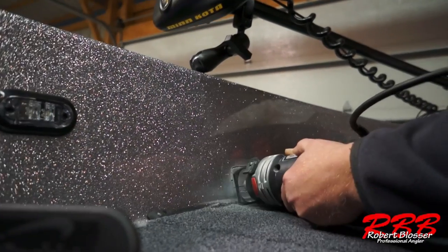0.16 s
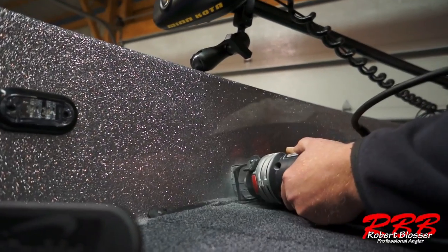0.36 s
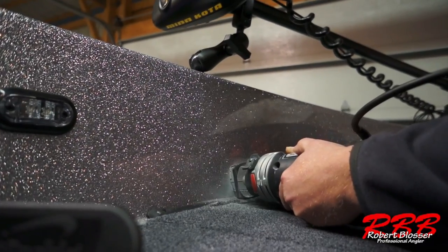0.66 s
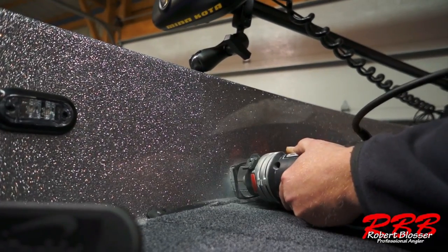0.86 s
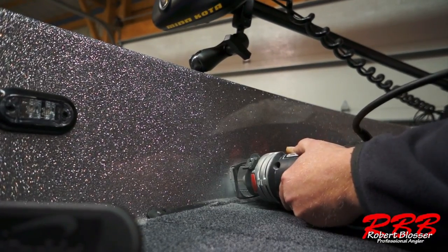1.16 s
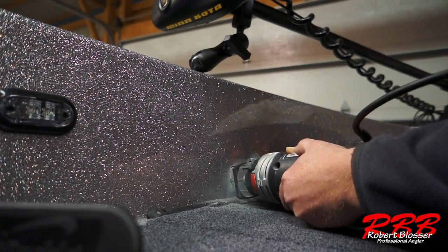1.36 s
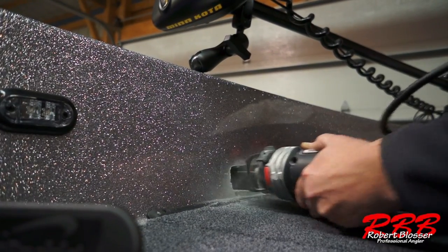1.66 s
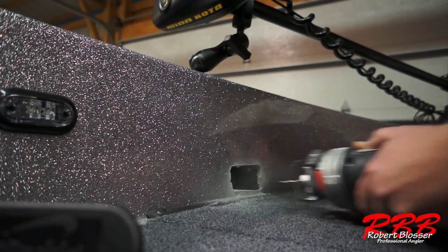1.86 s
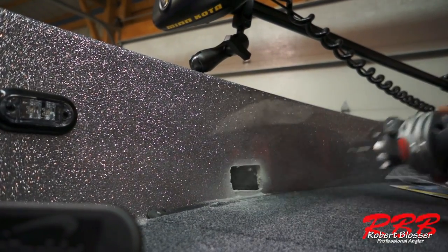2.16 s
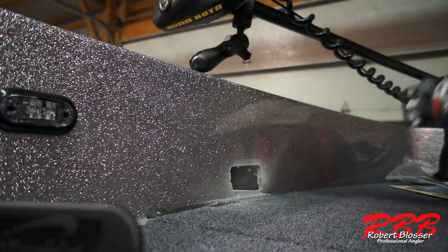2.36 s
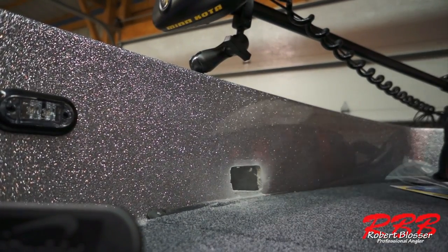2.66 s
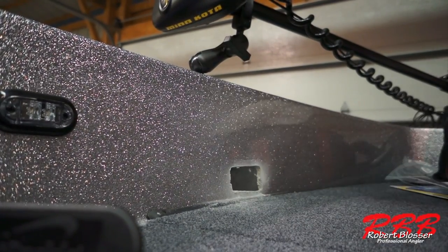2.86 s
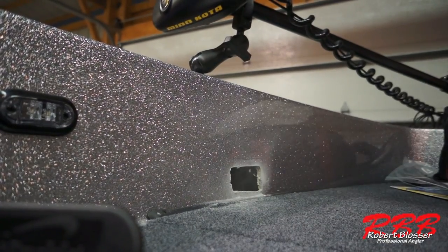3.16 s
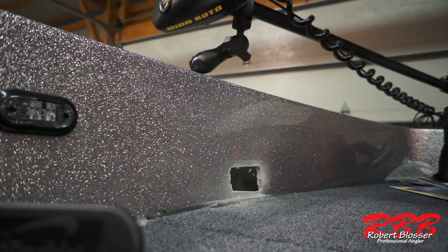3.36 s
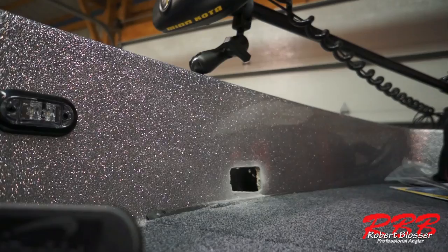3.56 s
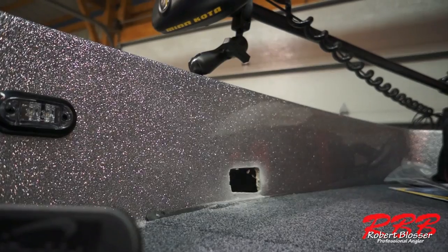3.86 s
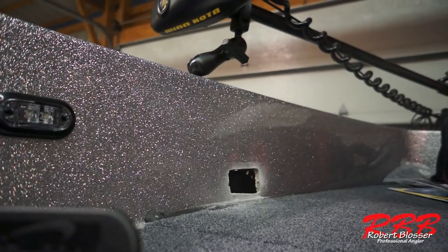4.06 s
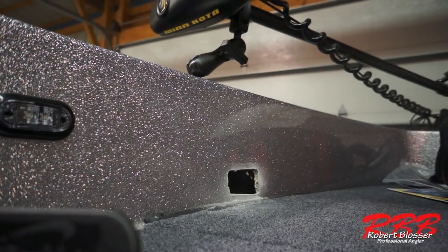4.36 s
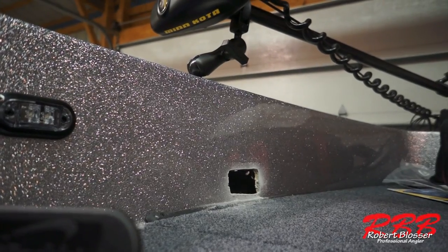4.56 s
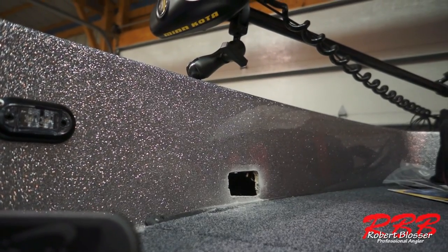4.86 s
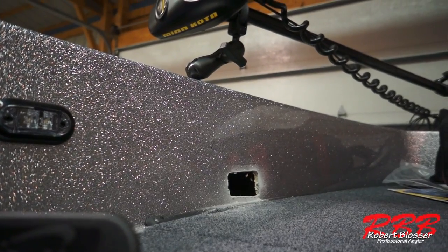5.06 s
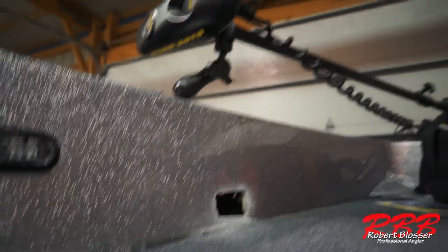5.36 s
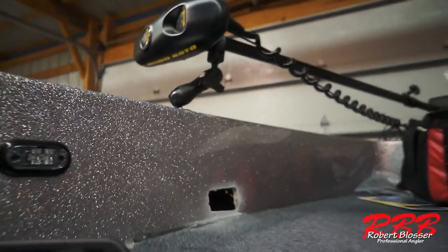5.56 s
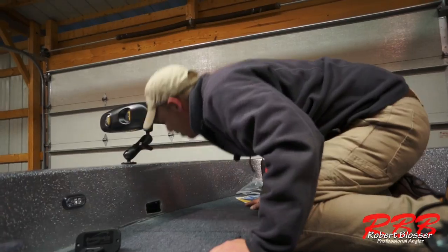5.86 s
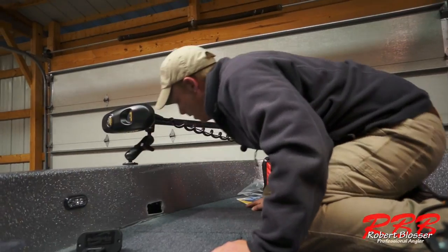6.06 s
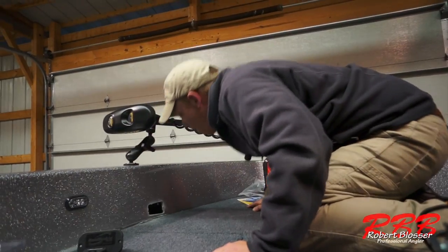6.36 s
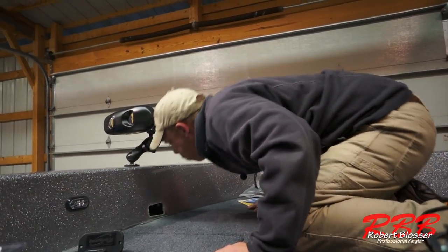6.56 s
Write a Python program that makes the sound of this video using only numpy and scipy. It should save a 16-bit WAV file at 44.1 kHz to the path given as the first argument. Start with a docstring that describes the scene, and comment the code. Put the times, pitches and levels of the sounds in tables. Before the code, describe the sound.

Close up in a garage, a small high-speed power saw is already cutting fibreglass: a steady, harsh buzzing whine with bright rasp and hiss. It comes out of the panel, rises slightly in pitch and runs free with airy fan noise. Switched off, it glides down over about two seconds with rattling bearing tones, then stops abruptly, leaving a quiet room and a soft thump.

```python
"""First a hand-held spiral saw cuts a fibreglass panel in a garage: its bit shakes the panel once a turn.
Very early the level dips briefly. The saw is drawn back, its echo off the panel changes, and it runs free.
Switched off, it coasts down: fan hiss, housing rumble and bearing tones change along the way.
At the end a short hiss and ring die away, a few low thumps sound, and the garage is nearly silent.
Tones are sines that follow the shaft speed; airflow, rattle and room are shaped noise."""
import sys
import numpy as np
from scipy import signal
from scipy.io import wavfile
from scipy.ndimage import uniform_filter1d, map_coordinates

SR = 44100
rng = np.random.default_rng(int(sys.argv[2]) if len(sys.argv) > 2 else 0)


def wav_out(sig):
    """Save sig, one row per channel (or a flat mono array), as 16-bit PCM at SR to the path in sys.argv[1]."""
    wavfile.write(sys.argv[1], SR, np.round(np.clip(np.atleast_2d(sig).T, -1, 1) * 32767).astype(np.int16))


N = 296352  # length in samples

# An "order" is a pitch counted in shaft turns: order 3 sounds three times a turn.
# Noise colours give only the shape of a noise; its level is set separately.

# quiet room noise: hz, relative_db_per_hz
GARAGE_COLOUR = [(15, -35), (25, -5), (75, 2), (180, -5), (437, -10), (594, -6), (657, -8), (1500, -12),
                 (2500, -16), (5210, -24), (6200, -21), (6600, -13), (7000, -23), (9130, -21), (11200, -32),
                 (14600, -62), (22000, -120)]
GARAGE_LEVEL_DB = -73
# faint tones in the garage: pitch_hz, level_db
GARAGE_TONES = [(360, -87), (1922, -93), (6487, -94), (6605, -87), (8888, -98)]
# hiss that dies away after the saw: hz, relative_db_per_hz
AFTER_COLOUR = [(40, -14), (150, -3), (300, -9), (500, -3), (1000, -6), (2200, -6), (3000, -12),
                (6000, -17), (9000, -22), (11200, -30)]
AFTER_START_DB, AFTER_DB_PER_S = -47, -135
RING_HZ, RING_START_DB, RING_DB_PER_S = 3400, -60, -100  # a ring in that tail

# dull low thumps: start_s, level_db, pitch_hz, time_to_fall_60_db_s
THUMPS = [(.768, -36, 80, .04), (.77, -36, 300, .025), (1.46, -42, 180, .05), (1.515, -44, 110, .06),
          (1.66, -48, 115, .18), (5.742, -53, 140, .04), (6.676, -38, 120, .03), (6.694, -40, 170, .03),
          (6.704, -42, 430, .025)]

# how alike left and right noise are: hz, likeness (1 is the same)
LIKENESS = [(60, 0.31), (140, 0.46), (250, 0.91), (600, 0.78), (1400, 0.85), (3000, 0.56), (6000, 0.43),
            (8500, 0.31), (11000, 0.57)]
# peaks and dips in the saw's noise while held against the panel: hz, change_db
IN_CUT_COLOUR = [(450, 3.5), (600, 3.5), (750, -1), (900, 0.5), (1150, 3), (1350, -4), (1600, 0.5),
                 (1800, -2.5), (2000, 1.5), (2450, 0.5), (2750, -3.5), (3150, -2.5), (3600, 4), (3900, -1),
                 (4700, 1.5), (5100, 0), (5350, 2), (5900, -0.5), (6400, 2.5)]
STREAK_DB = 2.24  # narrow, lasting random peaks within each noise

# noise levels: time_s, fan_hiss_db, rasp_db, buzz_db, rumble_db
AIR_LEVELS = [(0, -24.5, -27.5, -37, -35.5), (.14, -29.5, -33, -42, -36.5), (.72, -28.5, -36, -40.5, -37.5),
              (.79, -26, -29.5, -39.5, -32), (1, -26, -30.5, -36.5, -31.5), (1.45, -27, -32.5, -40, -33.5),
              (1.56, -24.5, -28, -36.5, -30.5), (2, -24.5, -28, -37.5, -33), (2.4, -25, -27.5, -36, -36),
              (2.9, -24.5, -30.5, -35, -38), (3.45, -24.5, -34.5, -35, -38.5),
              (4.1, -26.5, -34.5, -40, -39), (4.5, -26, -40, -38.5, -40), (4.78, -34, -38.5, -47.5, -43.5),
              (4.92, -31.5, -37.5, -49.5, -46.5), (5.04, -37, -42, -51, -46.5),
              (5.33, -42, -41.5, -54.5, -52.5), (5.7, -46, -44, -56.5, -51)]
# fan hiss: hz, relative_db_per_hz
HISS_COLOUR = [(3240, -51.5), (5500, -12.5), (6500, -11.5), (8930, 1), (10400, -5), (11200, -14),
               (14600, -40), (22000, -120)]
# the hiss peak slides as the saw turns away: time_s, factor_on_hz
HISS_SHIFT = [(0, 1.015), (2.3, 0.99), (2.9, 1.02), (3.6, 1.023), (4.15, 1.027), (4.5, 0.96), (4.9, 0.94),
              (5.7, 0.97)]
# rasp: hz, relative_db_per_hz
RASP_COLOUR = [(3600, -36.5), (4400, -5.5), (4800, -2), (5150, -5.5), (5650, -2), (6200, -4.5), (7200, 0),
               (8200, -22)]
# buzz: hz, relative_db_per_hz
BUZZ_COLOUR = [(2100, -38), (2700, -1.5), (3300, 1.5), (3900, 1), (4500, -3), (5200, -36.5)]
# housing rumble: hz, relative_db_per_hz
RUMBLE_COLOUR = [(35, -68), (60, -54.5), (195, -26), (357, -11), (435, -7), (688, 1), (908, -1),
                 (1120, 0.5), (1240, -1.5), (1560, 0.5), (2350, -3), (3000, -6.5), (3900, -16),
                 (6600, -120)]
# rough band round the commutator order: hz, relative_db_per_hz
SQUEAL_COLOUR = [(5000, -34), (5500, -9.5), (5700, -9.5), (5800, -9), (6400, -27)]
SQUEAL_DB = -34.5  # before its rise and fall
# rise and fall of that band: time_s, change_db
SQUEAL_SWELL = [(0, -3.5), (.25, -6), (.8, -2.5), (1.3, -1), (1.7, 3.5), (1.95, -0.5), (2.1, -7),
                (2.4, -31)]
# panel shudder: hz, relative_db_per_hz
SHUDDER_COLOUR = [(60, -38.5), (130, -13.5), (200, -8.5), (350, 3), (450, 10.5), (650, -24.5)]
SHUDDER_DB = -55.5  # before the change with bite
# rough mid band once the saw runs free: hz, relative_db_per_hz
WHIRR_COLOUR = [(1250, -35.5), (1500, -4.5), (1650, -2), (1900, -3), (2100, -2), (2400, -2.5), (2700, -30)]
# its level: time_s, level_db
WHIRR_LEVEL = [(2.1, -62.5), (2.5, -42), (3.6, -38), (4, -44.5), (4.4, -54)]
# rough band round the third order as the saw runs up: hz, relative_db_per_hz
GROWL_COLOUR = [(1200, -34), (1420, -5.5), (1490, 0), (1560, -6.5), (1800, -35.5)]
# its level: time_s, level_db
GROWL_LEVEL = [(1.6, -67), (1.75, -42.5), (1.95, -36.5), (2.1, -49), (2.3, -79)]
# rough low band late in the coast: hz, relative_db_per_hz
DRONE_COLOUR = [(550, -35.5), (760, -7.5), (900, -3), (1150, -0.5), (1300, -3), (1600, -34.5)]
# its level: time_s, level_db
DRONE_LEVEL = [(4.3, -70), (4.55, -48), (4.8, -39.5), (4.95, -45), (5.15, -59), (5.45, -57.5), (5.74, -50)]
# loose noise ringing in the housing: time_s, level_db
RATTLE_LEVEL = [(2, -55), (2.5, -49), (3.7, -56), (4.4, -73), (4.7, -48.5), (4.92, -44.5), (5.1, -47.5),
                (5.7, -76)]
# echo off the panel; the path grows as the saw is drawn back: time_s, extra_path_m, strength
PANEL_ECHO = [(0, .118, .1), (1.45, .118, .2), (1.58, .118, .26), (1.7, .147, .34), (1.78, .175, .36),
              (1.89, .215, .36), (1.97, .25, .24), (2.05, .29, .18), (2.13, .305, .15), (2.3, .36, 0)]
# left minus right as the saw moves: time_s, hiss_db, rasp_db, rumble_db
LEFT_MINUS_RIGHT = [(0, 5.5, 3.5, 6.5), (.6, 6.5, 4, 5), (1.5, 5.5, 3.5, 4), (2.2, 3, 3, 1.5),
                    (2.7, 7, 1.5, 2), (3.45, 10, 1, 2.5), (4.3, 9.5, 4, 2), (4.6, 7.5, 6, 1.5),
                    (5.7, 5.5, 7, 3.5)]
# how late the left side is: time_s, delay_samples
LEFT_LAG = [(0, 0), (1.6, 0), (2, 3), (6, 4)]

# resonances of the housing: pitch_hz, width_hz, peak_db
HOUSING = [(970, 250, -1), (1180, 82, -1.5), (1650, 120, -8), (1990, 110, -1.5), (2280, 120, -1.5),
           (2450, 110, -12), (3300, 130, -6)]
# ball-pass tones: order, relative_db, change_late_in_coast_db
BEARING_TONES = [(3.58, -43, -4), (4.17, -57, -6), (4.6, -45, -12), (5.62, -45, 0), (6.17, -56, -4),
                 (7.17, -42, -4), (8.21, -42, 5), (9.17, -56, 0)]
# level of all the ball-pass tones: time_s, change_db
BEARING_LEVEL = [(0, -24), (3.3, -17), (3.5, -10), (3.85, -0.5), (4, -13), (4.45, -10.5), (4.55, -5),
                 (4.92, 0), (5.05, -16), (5.75, -32)]
LATE_S = 4.97  # when the late change of the bearings begins
# thin whistle while coasting: loudest_at_s, level_db, rise_s, then_db_per_s
WHISTLE = (4.95, -45, .22, -8)
WHISTLE_ORDER = 39.3

# main orders: order, before_dip_db, early_cut_db, late_cut_db, free_db, coast_db
ORDERS = [(1, -35.5, -25.5, -30, -45.5, -58), (2, -32, -25, -29.5, -64.5, -77),
          (3, -49, -43, -56.5, -49.5, -85), (4, -47.5, -50.5, -34.5, -64.5, -67),
          (5, -62.5, -54, -49, -55.5, -71.5), (6, -48, -53.5, -49.5, -68, -70),
          (12, -53.5, -36.5, -36.5, -44.5, -59)]
# upper orders, louder with bite: order, level_at_full_bite_db
UPPER_ORDERS = [(7, -53), (8, -57), (9, -56), (10, -57), (11, -56), (14, -49), (15, -48), (16, -52),
                (18, -47), (20, -48), (21, -50)]
# hum under load: pitch_hz, level_at_full_bite_db
LOAD_HUM = [(119, -68.5), (237, -65)]
# single orders swell for a moment: peak_s, order, peak_db, half_width_s
SWELLS = [(.15, 3, -46, 0.058), (.17, 4, -40, 0.04), (.88, 4, -50, 0.039), (1.1, 3, -32.5, 0.093),
          (1.4, 3, -43, 0.07), (1.45, 4, -42.5, 0.034), (1.55, 2, -37, .07), (1.52, 12, -34, 0.062),
          (1.85, 3, -38, 0.18), (1.85, 12, -37, 0.11), (1.85, 4, -50.5, .05), (2.8, 2, -49.5, 0.3),
          (3.1, 4, -43.5, 0.27), (.7, 5, -45.5, 0.087), (.45, 6, -55, 0.22), (1.1, 6, -45.5, 0.22),
          (2.6, 5, -50.5, 0.37), (3.05, 6, -46, 0.58), (3.88, 4, -46, 0.065), (5.18, 12, -51, 0.04),
          (5.6, 12, -54, 0.05)]
# three orders in the cut: time_s, order_1_db, order_2_db, order_12_db
CUT_LEVELS = [(.13, -26, -28, -42), (.2, -26, -25, -44.5), (.25, -26.5, -25.5, -37), (.38, -25, -28, -39),
              (.46, -26, -28, -45), (.544, -24, -24, -34.5), (.618, -29.5, -25, -49.5),
              (.66, -29, -26.5, -39.5), (.77, -28, -26, -39), (.82, -29, -31, -41), (.9, -28.5, -29.5, -38),
              (1.05, -31, -30.5, -33), (1.16, -31, -30.5, -36), (1.234, -32, -34, -34.5),
              (1.282, -33, -19, -48), (1.33, -33.5, -26, -37), (1.368, -34.5, -27, -30),
              (1.41, -29.5, -28.5, -44.5), (1.47, -36, -36.5, -40)]
CUT_ORDERS = (1, 2, 12)
LEAVE_S, BUILD_S, DIE_S = 0.026, 0.39, 0.12  # leaving the cut, free whine building, orders dying after the switch
LEAVE_DIP_DB = -16
FREE_BITE_DB, COAST_BITE_DB = -11.5, -52.5
FADE_S, FADE_DB_PER_S = 4.82, -150  # late in the coast the main orders fade out

OUT_S, OFF_S, END_S = 1.47, 3.403, 5.745  # bit leaves the cut, switch opens, the saw's sound ends
LOADED_HZ, CREEP_HZ_PER_S, WOBBLE_HZ = 474.2, .6, .3  # turns per s in the cut, slow gain, rms shake from the load
SNAG_S, SNAG_HZ, SNAG_WIDTH_S = 1.283, 5, .025  # the bit snags and the speed sags for a moment
FREE_HZ, RUN_UP_S = 510.5, .5  # turns per s when free, time scale of running up
FRICTION_HZ_PER_S, DRAG_PER_TURN = 79.8, 6.39e-4  # slowing = friction + drag x speed squared

DRIFT_SAMPLES = 2.3  # rms: a slow random delay makes the low tones differ between left and right
LOW_CUT_HZ, EDGE_HZ = 150, 11080
DROP_S, DROP_DB, BACK_S = .104, -22, .025  # the brief dip: start, depth, time to fade back


def clock():
    """Time of every sample in seconds."""
    return np.arange(N) / SR


def gain_of(db):
    """Turns decibels into a multiplier."""
    return np.exp(np.asarray(db) * np.log(10) / 20)


def evened(x):
    """Scales a signal to rms 1."""
    return x / np.sqrt(np.mean(x ** 2) + 1e-20)


def read(points, hz):
    """Reads a spectrum on a log-frequency axis."""
    f, value = np.transpose(points)
    return np.interp(np.log(hz + 1), np.log(f + 1), value)


def played(rows):
    """Joins the rows of a curve with straight lines, one array a column."""
    s, *columns = np.transpose(rows)
    return [np.interp(clock(), s, column) for column in columns]


def wander(per_s):
    """Slow random drift of rms 1, with a new target per_s times a second."""
    steps = rng.standard_normal(int(N / SR * per_s) + 2)
    return evened(np.interp(clock() * per_s, np.arange(len(steps)), steps))


def delayed(x, samples):
    """Reads x a varying number of samples late."""
    return map_coordinates(x, [np.arange(N) - samples], order=3, mode="nearest")


def placed(x, pan_db):
    """Shares a sound between left and right by a level difference."""
    return x * gain_of([pan_db / 2, -pan_db / 2])


def tone(hz, db, flutter_db, start=None):
    """A sine along a pitch curve, its rms level db made unsteady."""
    start = rng.random() if start is None else start
    angle = 2 * np.pi * (np.cumsum(hz * np.ones(N)) / SR + start)
    level = gain_of(db + flutter_db * wander(per_s=30))
    return np.sqrt(2) * level * np.cos(angle)


def noise(colour, patchy_db, in_cut=False, shift=((0, 1), (1, 1))):
    """Two partly alike channels of random short-time spectra with drifting patches and narrow streaks."""
    frames, hz = N // 256 + 5, np.fft.rfftfreq(1024, 1 / SR)
    t = np.arange(frames) * 256 / SR
    a, b, c, d, raw = rng.standard_normal((frames, 513, 5)).T
    # streaks: narrow in pitch, long in time; the pitch axis is flipped to part them from the patches
    streaks = uniform_filter1d(raw[::-1], size=2, axis=0)
    streaks = evened(uniform_filter1d(streaks, size=30, axis=1))
    patches = uniform_filter1d(raw, size=12, axis=0)
    patches = evened(uniform_filter1d(patches, size=16, axis=1))
    same = np.clip(read(LIKENESS, hz), -1, 1)[:, None]
    left = a + 1j * b
    right = same * left + np.sqrt(1 - same ** 2) * (c + 1j * d)
    cutting = np.clip((OUT_S - t) / .1 + 1, 0, 1) * in_cut
    colour_db = read(colour, hz[:, None] / np.interp(t, *np.transpose(shift)))
    colour_db = colour_db + read(IN_CUT_COLOUR, hz)[:, None] * cutting
    spectra = np.array([left, right]) * gain_of(colour_db + patchy_db * patches + STREAK_DB * streaks)
    return evened(signal.istft(spectra, nperseg=1024, noverlap=768)[1][:, :N])


def garage():
    """Quiet room noise, a few faint tones, and a hiss and ring that die away once the saw is gone."""
    room = gain_of(GARAGE_LEVEL_DB) * noise(GARAGE_COLOUR, 0.5)
    room = room + sum(tone(hz, db, 2.5) for hz, db in GARAGE_TONES)
    since = np.maximum(clock() - END_S, 0)
    tail = gain_of(AFTER_START_DB + AFTER_DB_PER_S * since) * noise(AFTER_COLOUR, 0.72)
    ring = tone(RING_HZ + 25 * wander(per_s=60), RING_START_DB + RING_DB_PER_S * since, 1.5)
    return room + (tail + ring) * (since > 0)


def thumps():
    """Dull low thumps: fading sines; long ones start softly."""
    out, t = np.zeros(N), np.arange(8000) / SR
    for start_s, db, hz, t60 in THUMPS:
        rise = 1 - np.exp(-t / (0.11 * t60))
        thump = rise * gain_of(db - 60 * t / t60) * np.sin(2 * np.pi * hz * t)
        part = out[round(start_s * SR):][:len(t)]
        part += thump[:len(part)]
    return out


def staged(before, early, late, left, free, coast):
    """A level in dB through the stages: before the dip, cutting, leaving, running free, coasting."""
    s = [DROP_S, DROP_S + BACK_S, OUT_S, OUT_S + LEAVE_S, OUT_S + BUILD_S, OFF_S, OFF_S + DIE_S]
    return np.interp(clock(), s, [before, early, late, left, free, free, coast])


def bite_db():
    """How hard the bit works: full in the cut, little when free, almost nothing when coasting."""
    return staged(0, 0, 2.0, FREE_BITE_DB, FREE_BITE_DB, COAST_BITE_DB)


def housing(hz):
    """Gain of the housing's resonances: each lifts the pitches near its own."""
    return sum(gain_of(db) / (1 + ((hz - f) / (width / 2)) ** 2) for f, width, db in HOUSING)


def rattle():
    """Loose noise ringing in the housing's resonances."""
    hz = np.geomspace(300, 6000, num=200)
    colour = np.transpose([hz, 20 * np.log10(housing(hz))])
    return gain_of(played(RATTLE_LEVEL)[0]) * noise(colour, 2.1)


def airflow(turns):
    """Hiss and rasp throb a little once a turn and echo off the panel; the housing rumbles below."""
    hiss_db, rasp_db, buzz_db, rumble_db = played(AIR_LEVELS)
    hiss_pan, rasp_pan, rumble_pan = played(LEFT_MINUS_RIGHT)
    hiss = gain_of(hiss_db) * noise(HISS_COLOUR, 1.0, shift=HISS_SHIFT)
    rasp = gain_of(rasp_db) * noise(RASP_COLOUR, 1.5, in_cut=True)
    rasp += gain_of(buzz_db) * noise(BUZZ_COLOUR, 0.36, in_cut=True)
    squeal = gain_of(SQUEAL_DB + played(SQUEAL_SWELL)[0]) * noise(SQUEAL_COLOUR, 3.1)
    bright = placed(hiss, hiss_pan) + placed(rasp + squeal, rasp_pan)
    bright *= 1 + 0.087 * np.cos(2 * np.pi * np.cumsum(turns) / SR)

    path_m, strength = played(PANEL_ECHO)
    echo = np.array([delayed(side, path_m / 343 * SR) for side in bright])  # sound travels 343 m/s
    bright = (bright + strength * echo) / np.sqrt(1 + strength ** 2)
    bright *= gain_of(0.5 * wander(per_s=25))

    low = gain_of(rumble_db) * noise(RUMBLE_COLOUR, 0.72, in_cut=True)
    low += gain_of(SHUDDER_DB + 3.4 * bite_db()) * noise(SHUDDER_COLOUR, 3.5)
    low += gain_of(played(WHIRR_LEVEL)[0]) * noise(WHIRR_COLOUR, 1.5)
    low += gain_of(played(GROWL_LEVEL)[0]) * noise(GROWL_COLOUR, 1.5)
    low += gain_of(played(DRONE_LEVEL)[0]) * noise(DRONE_COLOUR, 2.5)
    return bright + placed(low + rattle(), rumble_pan)


def bearings(turns):
    """Ball-pass tones swell as they sweep through the housing's resonances; a whistle joins in the coast."""
    balls, t = np.zeros(N), clock()
    late = np.clip((t - LATE_S) / .05, 0, 1)
    for order, db, late_db in BEARING_TONES:
        balls += housing(order * turns) * tone(order * turns, db + late_db * late, 3.5)
    peak_s, db, rise_s, fall_db = WHISTLE
    level_db = db + fall_db * np.maximum(t - peak_s, 0)
    level_db -= 10 * (np.maximum(peak_s - t, 0) / rise_s) ** 2
    whistle = tone(WHISTLE_ORDER * turns, level_db, 2.0)
    return balls * gain_of(played(BEARING_LEVEL)[0]) + whistle


def speed():
    """Turns per second: held down by the cut, running up once free, then slowed by friction and fan drag."""
    t = clock()
    loaded = LOADED_HZ + CREEP_HZ_PER_S * np.minimum(t, OUT_S)
    loaded += WOBBLE_HZ * wander(per_s=12) * (t < OUT_S)
    loaded -= SNAG_HZ * np.exp(-((t - SNAG_S) / SNAG_WIDTH_S) ** 2)
    free_time = np.clip(t - OUT_S, 0, OFF_S - OUT_S)
    powered = FREE_HZ - (FREE_HZ - loaded) * np.exp(-free_time / RUN_UP_S)
    even = np.sqrt(FRICTION_HZ_PER_S / DRAG_PER_TURN)  # speed at which friction equals drag
    coast_time = np.maximum(t - OFF_S, 0)
    return even * np.tan(np.arctan(powered / even) - even * DRAG_PER_TURN * coast_time)


def order_db(order, before, early, late, free, coast):
    """Level of one order: its stage plus its swells, or its own curve in the cut if it has one."""
    t = clock()
    stage_db = staged(before, early, late, free + LEAVE_DIP_DB, free, coast)
    level = gain_of(stage_db + FADE_DB_PER_S * np.maximum(t - FADE_S, 0))
    for peak_s, swelling, db, width_s in SWELLS:
        if round(swelling) == round(order):
            level = level + gain_of(db) * np.exp(-((t - peak_s) / width_s) ** 2)
    level_db = 20 * np.log10(level + 1e-9)
    if round(order) in CUT_ORDERS:
        cutting = (t > DROP_S) & (t < OUT_S)
        cut_db = played(CUT_LEVELS)[CUT_ORDERS.index(round(order))]
        level_db = np.where(cutting, cut_db, level_db)
    return uniform_filter1d(level_db, size=400)  # soften the steps


def shaft(turns):
    """Unbalance and the bit beating the panel sound on whole orders; the low ones line up as one blow a turn."""
    first, *rest, commutator = ORDERS
    low = tone(turns, order_db(*first), 0.5, start=.5)  # start is a share of a cycle
    low += sum(tone(round(row[0]) * turns, order_db(*row), 0.71, start=0.48) for row in rest)
    low += sum(tone(hz, db + 3.3 * bite_db(), 4.1) for hz, db in LOAD_HUM)
    high = tone(round(commutator[0]) * turns, order_db(*commutator), 0.94)
    high += sum(tone(order * turns, db + bite_db(), 2.6) for order, db in UPPER_ORDERS)
    return low, high


def scene():
    """The saw's tones and noise share one shaft speed; thumps and the garage are added."""
    turns, pan_db = speed(), played(LEFT_MINUS_RIGHT)[-1]
    whine, upper = shaft(turns)
    whine = np.array([whine, delayed(whine, DRIFT_SAMPLES * wander(per_s=3))])
    tones = placed(whine + upper, pan_db) + bearings(turns) * gain_of([[2.5], [-2.5]])
    low_cut = signal.butter(2, LOW_CUT_HZ, "high", fs=SR, output="sos")  # the saw's deep bass is filtered out
    left, right = signal.sosfilt(low_cut, airflow(turns) + tones)
    ending = np.clip((END_S - clock()) / .004 + 1, 0, 1)
    saw = np.array([delayed(left, played(LEFT_LAG)[0]), right]) * ending
    return saw + placed(thumps(), pan_db) + garage() * gain_of([[1.8], [-1.8]])


def record(dry):
    """The level dips for a moment and fades back; then the highest treble is cut off."""
    since = clock() - DROP_S
    dip = np.clip(since / .002 + .5, 0, 1) * np.clip(1 - since / BACK_S, 0, 1)
    dipped = dry * gain_of(DROP_DB * dip)
    dipped = dipped * np.clip(clock() / .002, 0, 1)  # short fade in
    treble_cut = signal.firwin(1023, EDGE_HZ, window=("kaiser", 9), fs=SR)
    return signal.oaconvolve(dipped, treble_cut[None], "same")


dry = scene()
out = record(dry)
wav_out(out)
```